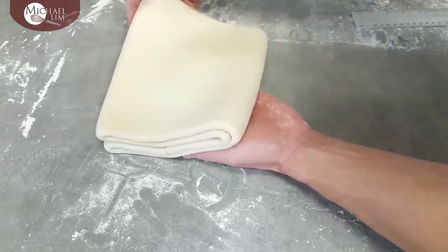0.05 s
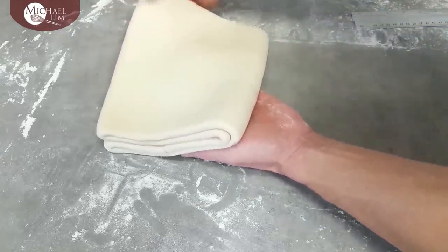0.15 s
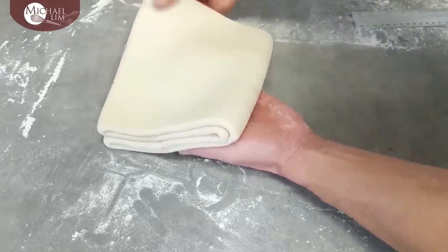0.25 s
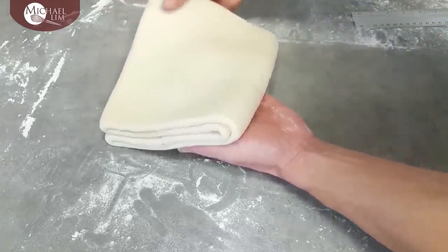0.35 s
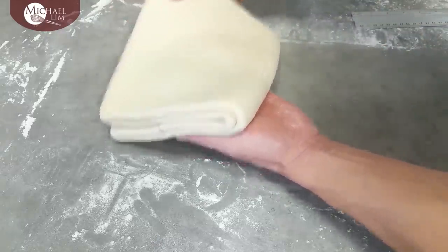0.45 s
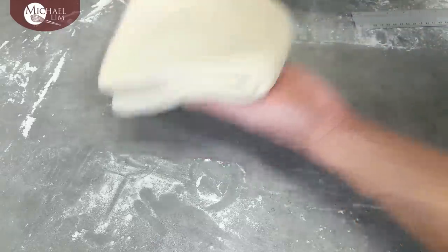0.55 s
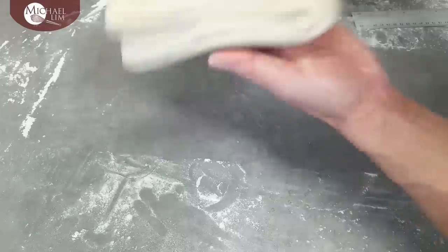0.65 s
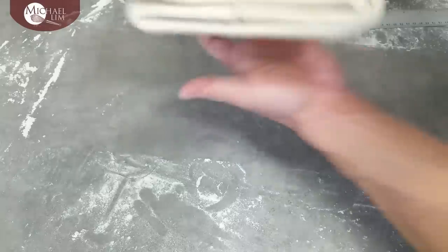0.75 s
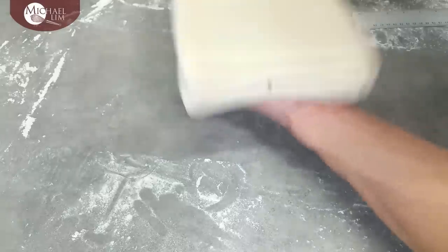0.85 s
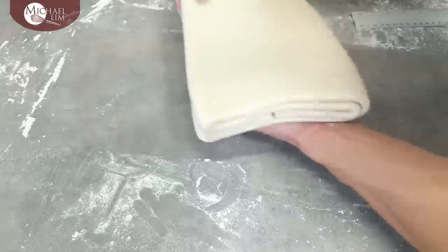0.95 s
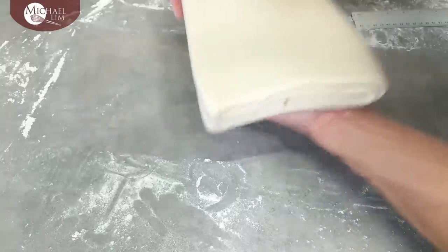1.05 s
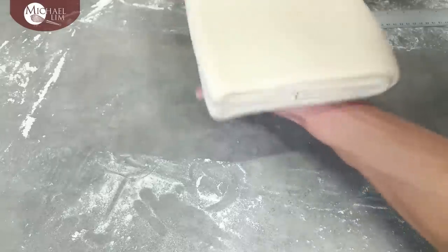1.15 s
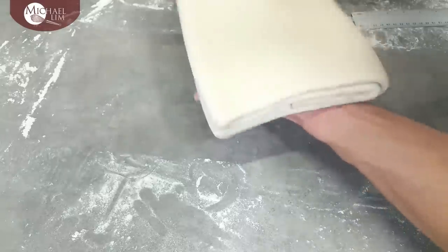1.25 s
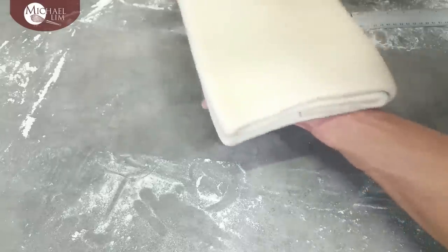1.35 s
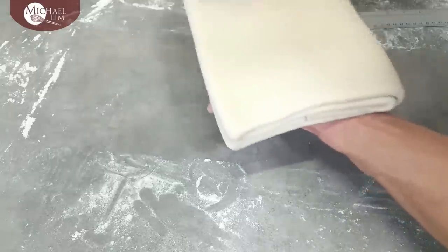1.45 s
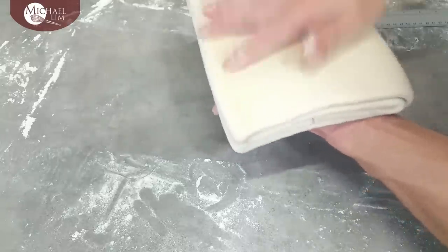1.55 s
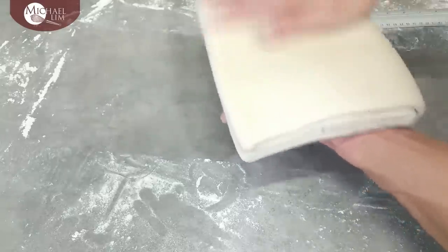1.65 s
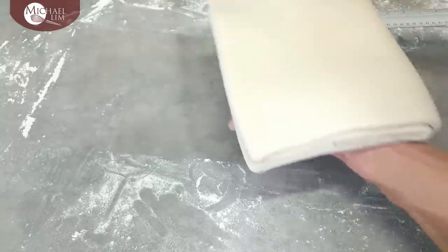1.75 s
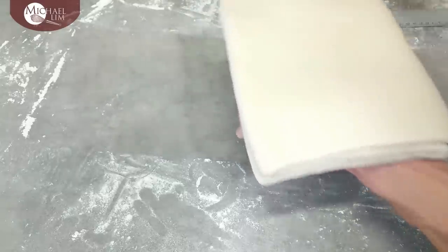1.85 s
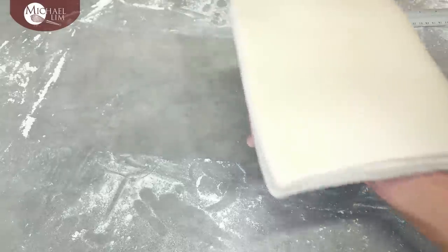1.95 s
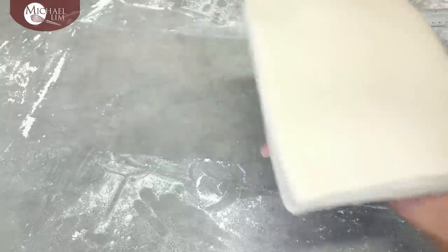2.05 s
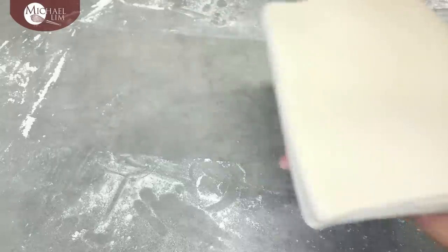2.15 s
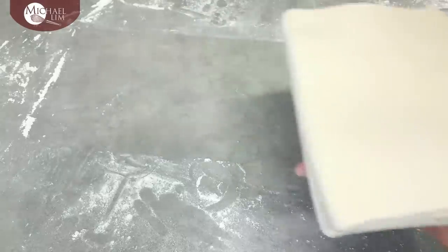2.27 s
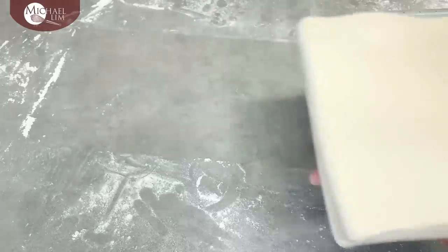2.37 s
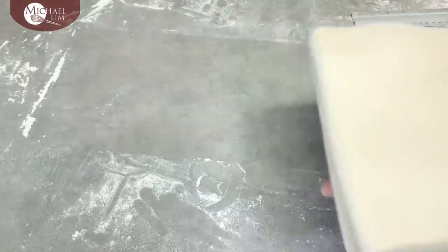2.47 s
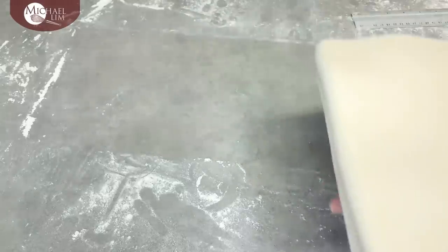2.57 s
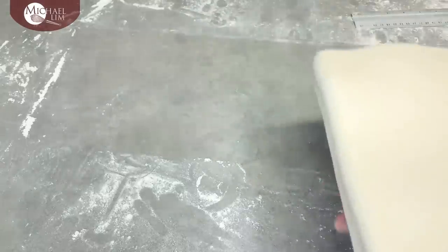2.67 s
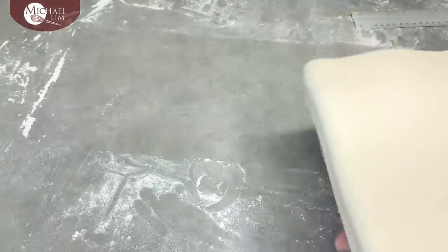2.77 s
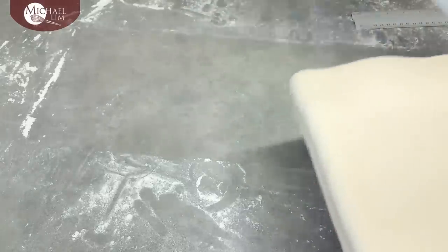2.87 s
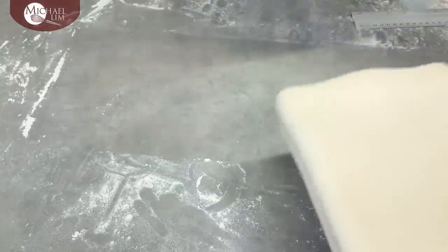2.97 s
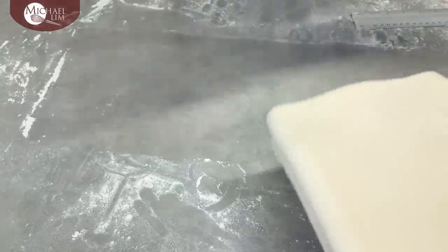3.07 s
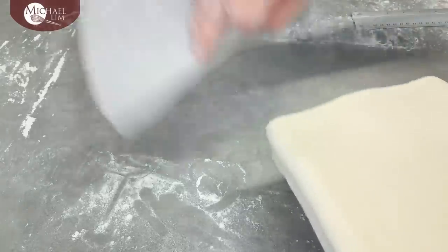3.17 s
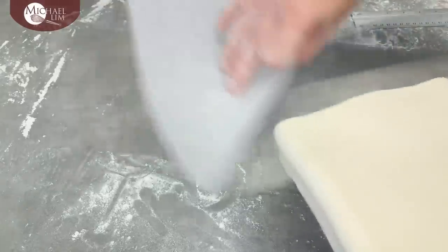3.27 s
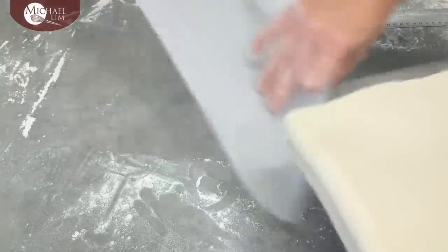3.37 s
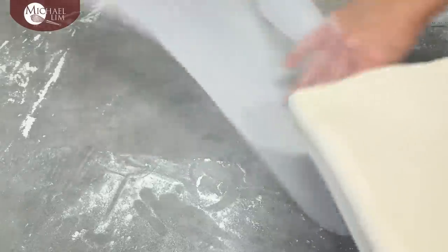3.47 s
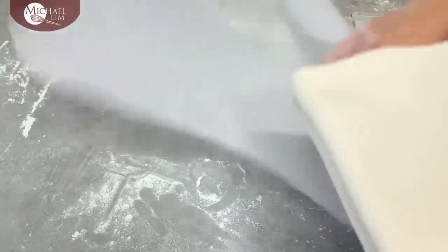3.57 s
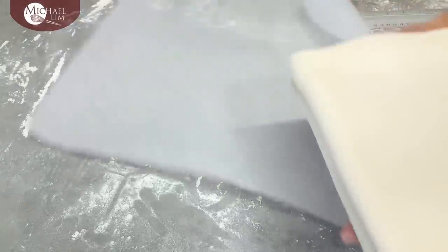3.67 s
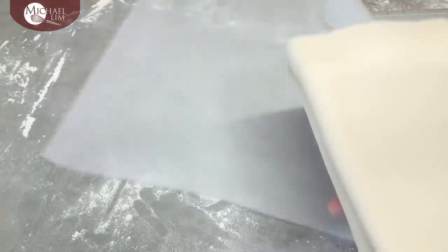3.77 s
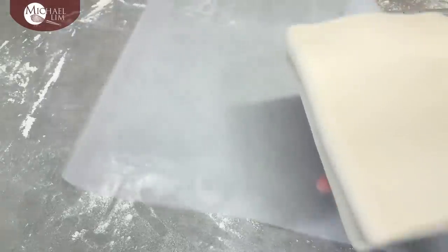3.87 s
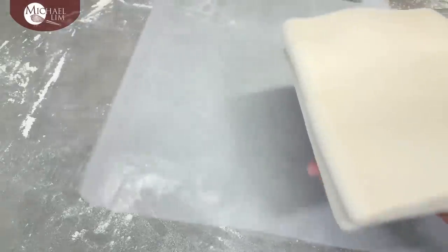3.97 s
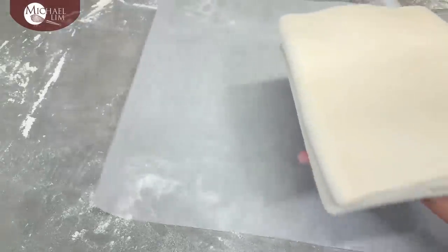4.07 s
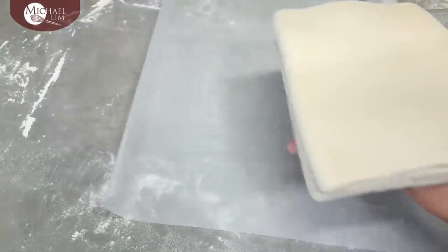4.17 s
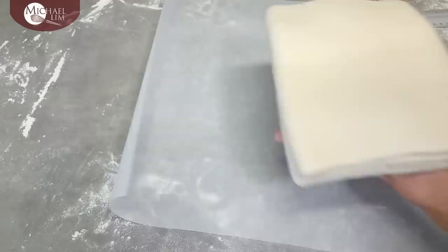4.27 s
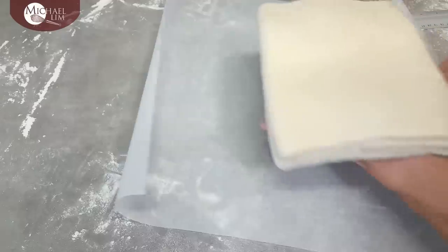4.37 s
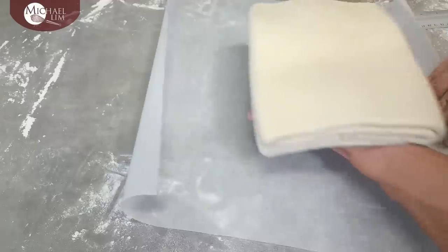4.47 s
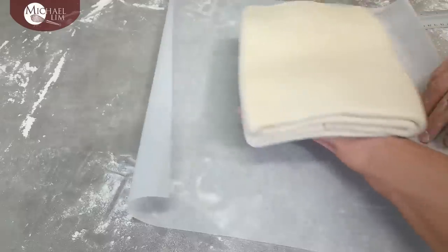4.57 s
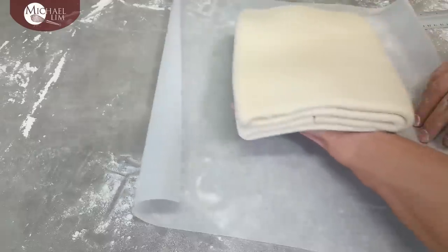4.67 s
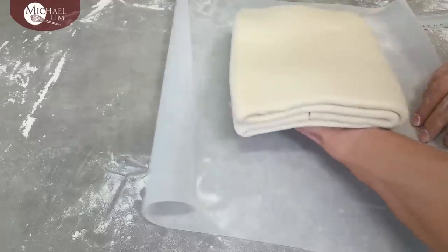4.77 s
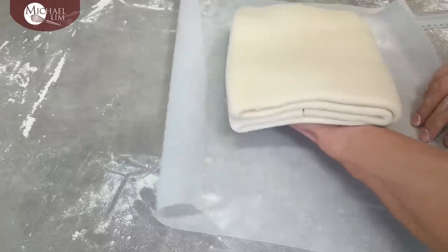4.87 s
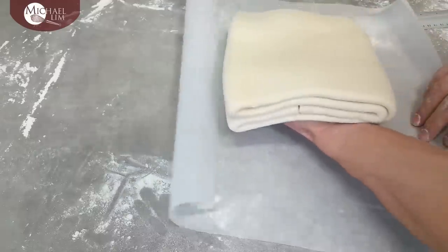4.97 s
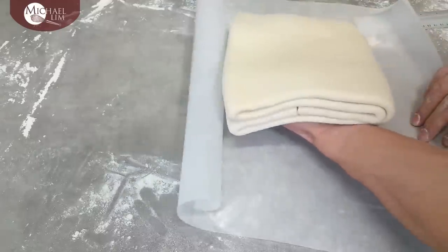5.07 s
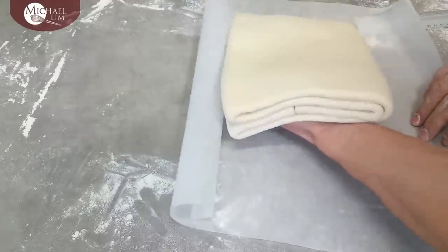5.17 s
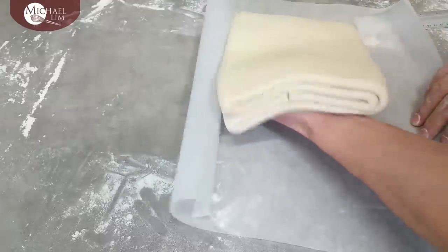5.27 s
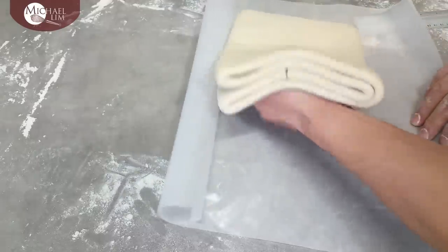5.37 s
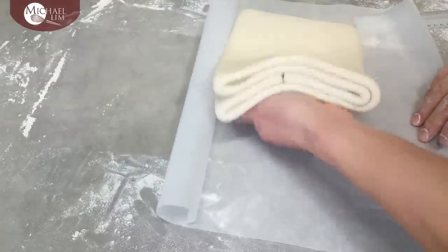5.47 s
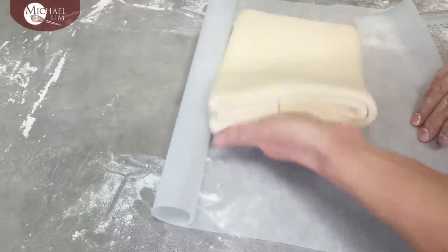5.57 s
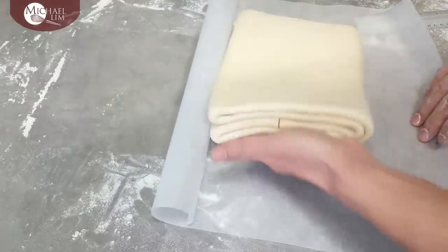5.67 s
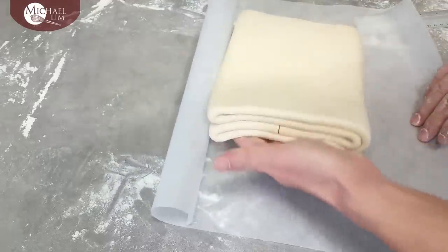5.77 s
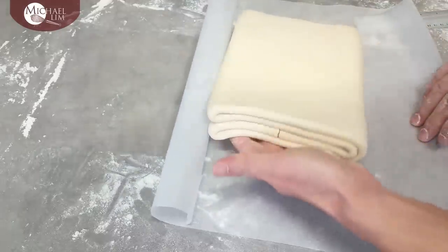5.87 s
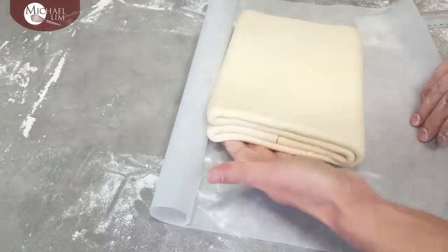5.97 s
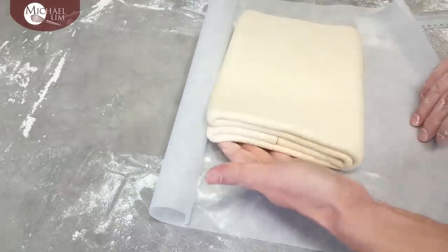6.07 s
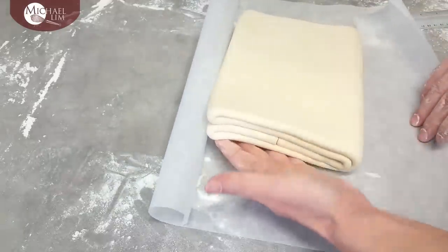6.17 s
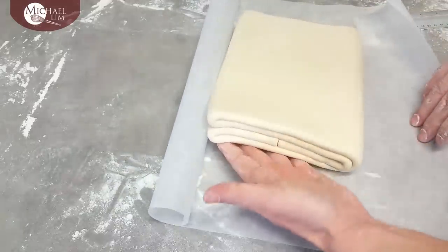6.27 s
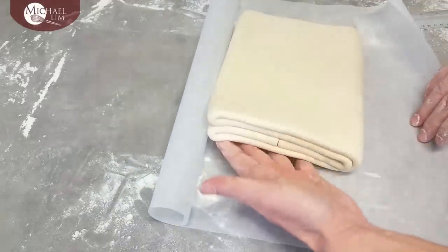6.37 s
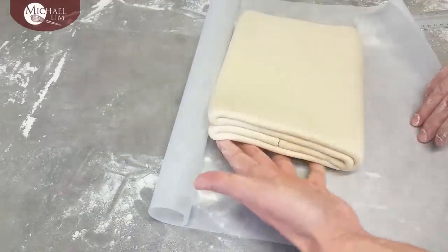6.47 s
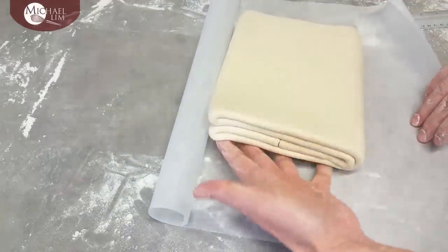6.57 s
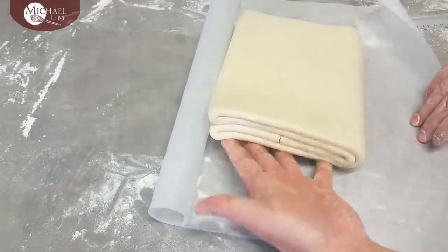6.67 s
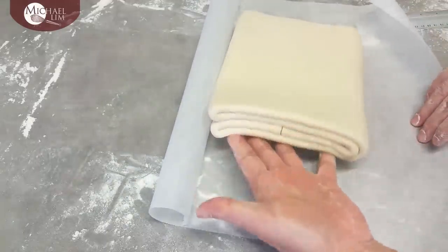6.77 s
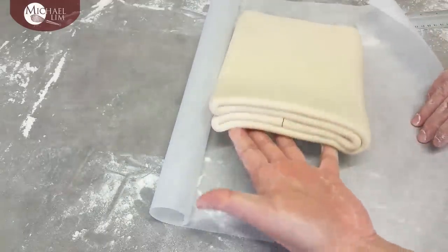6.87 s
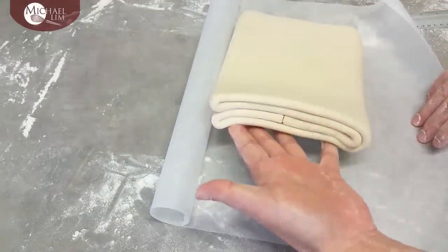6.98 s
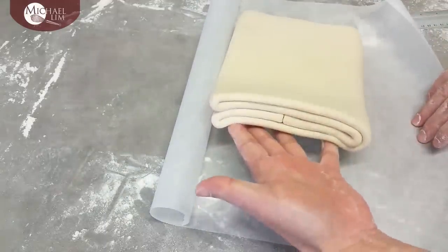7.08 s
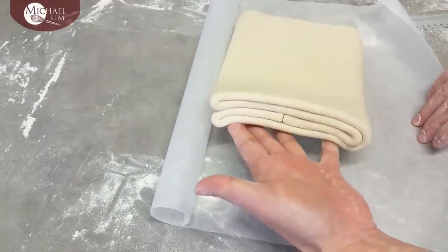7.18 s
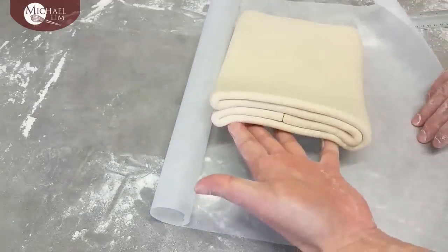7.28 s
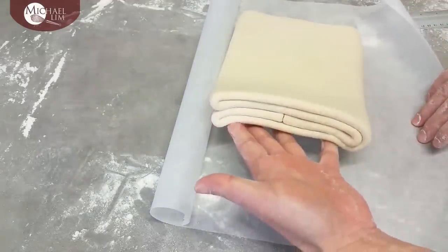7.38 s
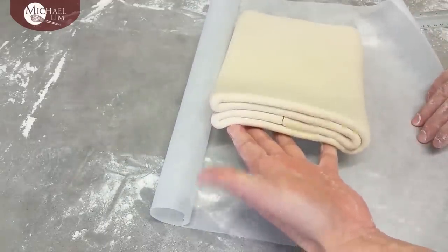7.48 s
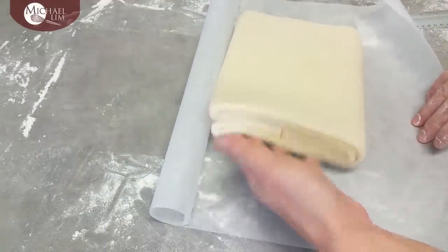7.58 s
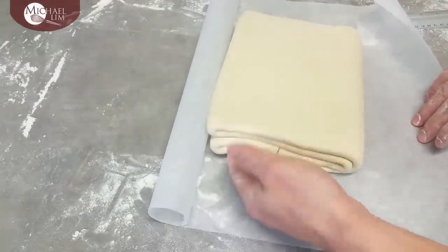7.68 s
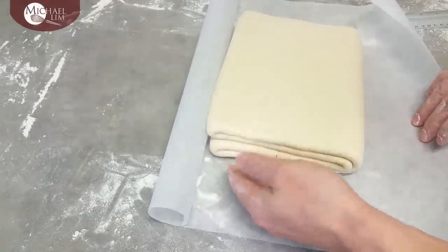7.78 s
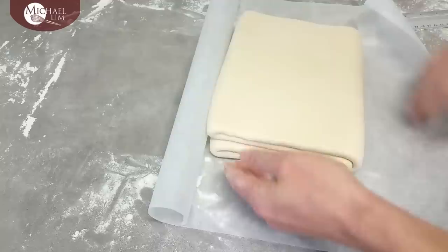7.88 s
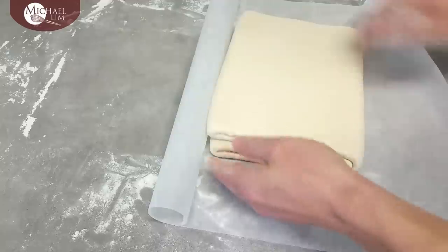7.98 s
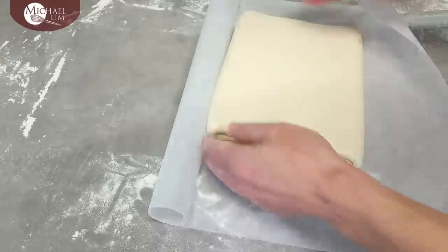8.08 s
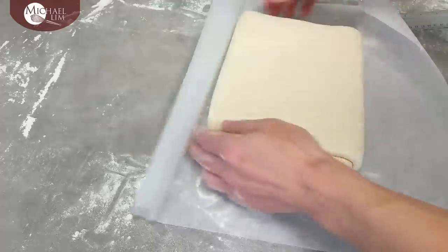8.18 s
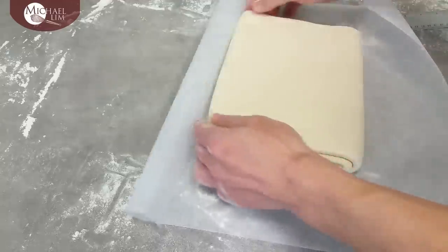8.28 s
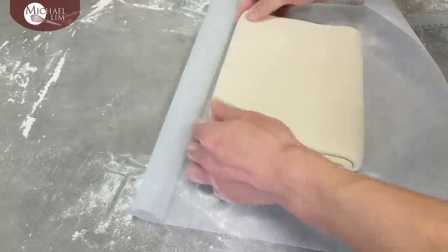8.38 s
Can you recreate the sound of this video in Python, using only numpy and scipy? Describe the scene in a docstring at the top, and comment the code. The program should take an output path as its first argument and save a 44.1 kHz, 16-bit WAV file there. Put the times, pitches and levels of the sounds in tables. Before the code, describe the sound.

A palm pats dough before crisp baking paper is pulled out with crinkles and snaps, and the dough slides softly onto it.

```python
"""Soft pats of a palm on a folded block of dough, close to a stereo pair of microphones in a kitchen.
Then, louder, a sheet of baking parchment is pulled out and laid on a steel bench, and the dough is slid
onto it. The sheet rustles with countless tiny buckles and snaps where a crease flips.
Hard walls ring behind it, over a low ventilation noise."""
import sys
import numpy as np
from scipy import signal
from scipy.fft import rfft, irfft, next_fast_len
from scipy.io import wavfile

SR = 44100
rng = np.random.default_rng(int(sys.argv[2]) if len(sys.argv) > 2 else 0)


def digitize_waveform(pressure):
    """Quantize a signal to 16-bit integers and store it at the path in sys.argv[1].

    Rows of a 2-D input are taken as channels; values are limited to [-1, 1].
    """
    field = np.atleast_2d(pressure).T
    bounded = np.clip(field, -1, 1)
    quanta = np.round(bounded * 32767).astype(np.int16)
    wavfile.write(sys.argv[1], SR, quanta)


N = 371763
TIME = np.arange(N) / SR


# spectrum of the sheet in free air: f/Hz, level/dB
FREE_SHEET = [(59, -87), (100, -5), (210, -25), (356, -10.5), (405, -16.5), (522, -7.5), (886, -5),
              (1140, 0), (1640, 1.5), (1750, 0.5), (4160, -2.5), (6920, -11), (7690, -14.5), (11500, -12.5),
              (15800, -27)]
# pulls and shakes in front of the microphones: t/s, rise/s, hold/s, level/dB, relative crispness/dB
PULL_STROKES = [(2.268, 0.012, 0.043, -40.5, -6), (2.302, 0.01, 0.11, -33, -7),
                (2.44, 0.027, .07, -34.5, -8), (2.525, 0.081, .02, -26.5, -7),
                (2.64, 0.053, .06, -34.5, -5), (2.705, 0.029, 0.018, -27.5, -5.5),
                (2.76, 0.02, 0.21, -31, -8.5), (2.99, 0.043, 0.066, -38.5, -14),
                (3.065, 0.026, 0.031, -37.5, -7), (3.14, 0.018, 0.079, -44.5, -13),
                (3.294, 0.025, 0.021, -38.5, -6.5), (3.37, 0.064, 0.25, -46, -10.5),
                (3.591, 0.0045, 0.0051, -27.5, -8), (3.635, 0.032, 0.13, -40, -13),
                (3.78, 0.023, 0.063, -50.5, -10)]
def pulled_sheet():
    """The sheet buckles and billows as it is pulled out."""
    return rustle(PULL_STROKES, FREE_SHEET, hiss_db=-1.5, billow_db=-13.5, body_db=0.5, crisp_db=-1)


# spectrum of the curling sheet: f/Hz, level/dB
CURLING_SHEET = [(500, -25), (1000, -9), (1600, -6.5), (2300, -0.5), (3500, -3.5), (5000, -7), (7700, -16),
                 (11500, -12.5), (15800, -27)]
# its movements on the bench: t/s, rise/s, hold/s, level/dB, relative crispness/dB
CURL_STROKES = [(3.84, 0.065, 0.058, -45, -8.5), (3.957, .01, 0.09, -40, -9), (4.03, 0.03, 0.016, -37, -7),
                (4.199, 0.014, 0.0075, -35, -8), (4.235, 0.011, 0.017, -51, -17),
                (4.3, 0.058, 0.14, -51, -5.5), (4.43, 0.033, 0.014, -48, -12.5),
                (4.54, 0.049, 0.13, -62, -16)]
def curling_sheet():
    """The landed sheet settles and its edge curls up."""
    return rustle(CURL_STROKES, CURLING_SHEET, hiss_db=-1, billow_db=-20, body_db=-2.5, crisp_db=-2.5)


# spectrum of the sheet lying on steel: f/Hz, level/dB
LYING_SHEET = [(290, -25), (500, -18), (639, -10.5), (739, -5.5), (904, -3), (986, -4.5), (1540, -1.5),
               (2250, -6.5), (4120, -11.5), (6830, -22.5), (7670, -24.5), (12200, -22), (15800, -36)]
# slides at the bench: t/s, rise/s, hold/s, level/dB, relative crispness/dB
SLIDE_STROKES = [(4.86, 0.022, .1, -61, -14.5), (4.999, 0.0069, 0.0069, -45, -21),
                 (5.03, 0.11, .16, -47, -11.5), (5.282, 0.0026, 0.0053, -41, -23),
                 (5.33, 0.067, 0.21, -46.5, -9), (5.547, 0.0047, 0.18, -46, -8.5),
                 (5.75, 0.025, 0.13, -56.5, -9), (5.95, 0.04, 0.17, -54, -10), (6.2, 0.019, 0.01, -54, -18),
                 (6.31, 0.022, 0.36, -61, -7.5), (6.47, 0.083, 0.033, -54.5, -5.5),
                 (6.66, 0.008, .025, -60.5, -26), (6.72, 0.038, 0.2, -75, -12),
                 (7.67, 0.084, 0.034, -53.5, -14), (7.756, 0.0084, 0.0067, -47.5, -16),
                 (7.78, 0.026, 0.093, -52, -9), (7.94, 0.065, 0.25, -52, -6),
                 (8.19, 0.086, 0.094, -43.5, -9.5), (8.386, 0.019, .04, -38.5, -8.5)]
def sliding_on_sheet():
    """Hand and dough rub over the lying sheet with a duller rustle."""
    return rustle(SLIDE_STROKES, LYING_SHEET, hiss_db=-4.5, billow_db=-18, body_db=-0.5, crisp_db=-1)


def rustle(strokes, spectrum, hiss_db, billow_db, body_db, crisp_db):
    """Buckles and sliding friction under each stroke; the sheet billows low in step with it."""
    grain = coloured(buckles() + from_db(hiss_db) * long_noise(), spectrum)
    body = from_db(body_db) * rms_one(cut(grain, "band", [700, 5000], order=3))
    top = from_db(crisp_db) * rms_one(cut(grain, "band", [5000, 19000], order=3))
    billow = rms_one(cut(coloured(long_noise(), FREE_SHEET), "band", [150, 700], order=3))
    body_gain, top_gain = stroke_gains(strokes)
    return body_gain * (body + from_db(billow_db) * billow) + top_gain * top


def buckles(per_s=2200, spread_db=4, clump_db=4.5, flex_db=1):
    """Tiny buckles come in clumps; each briefly rings a facet, and facets change as the sheet flexes."""
    born = np.flatnonzero(rng.random(N) < per_s / SR * from_db(clump_db * drift(70)))
    size, sign, facet, place = rng.random((4, N))[:, born]
    size = from_db(spread_db * np.minimum(-np.log(1 - size), 4)) * np.sign(sign - .5)
    lag = ((2 * place - 1) * .0004 * SR).astype(int)   # path difference between the microphones
    pitches, out = np.geomspace(500, 14000, 12), 0
    for k, hz in enumerate(pitches):
        here = (facet * len(pitches)).astype(int) == k
        clicks = np.zeros((2, N))
        clicks[0, born[here]] = size[here]
        clicks[1, np.clip(born + lag, 0, N - 1)[here]] = size[here]
        ring = resonate(clicks + 1e-18, hz, hz * 0.5)
        out = out + 0.77 * clicks + from_db(flex_db * drift(9)) * ring
    return rms_one(out)


def stroke_gains(strokes, sag_db_per_s=9, release_db_per_s=212):
    """Each stroke rises, sags while held and dies away; gives gains for the body and the crisp top."""
    body, top = np.zeros((2, N))
    for start, rise, hold, db, crisp_db in strokes:
        first = int(start * SR)
        t = TIME[:min(N - first, SR)]
        sag_db = sag_db_per_s * np.maximum(t - rise, 0)
        release_db = release_db_per_s * np.maximum(t - rise - hold, 0)
        gain = np.minimum(t / rise, 1) * from_db(db - sag_db - release_db)
        body[first:first + len(t)] += gain ** 2
        top[first:first + len(t)] += (gain * from_db(crisp_db)) ** 2
    return np.sqrt(body), np.sqrt(top)


# creases giving way, close by: t/s, level/dB, facet f/Hz, relative treble/dB
CREASES = [(2.345, -16.5, 1600, -7), (2.396, -14.5, 1160, -15), (2.58, -12.5, 1020, -31),
           (2.61, -12, 2930, 9), (2.727, -11, 2300, 1), (2.817, -13, 1880, -8), (2.93, -10.5, 1910, -7),
           (3.331, -28, 1650, -27), (3.538, -22, 1440, -19), (3.597, -20, 1600, -31),
           (4.004, -32, 2620, -7), (4.066, -20, 2700, -5), (4.217, -21.5, 1600, -8),
           (4.473, -29.5, 2030, -15), (5.294, -23.5, 1190, -29), (5.555, -28, 1580, -31),
           (5.584, -35, 1060, -35), (5.647, -27, 2720, -6), (5.718, -33.5, 1130, -28),
           (6.118, -36.5, 1850, -22), (8.028, -37, 1600, -23), (8.229, -26, 1930, -12),
           (8.338, -30, 1650, -32), (8.394, -24.5, 1260, -21)]
def crumples():
    """Creases flip loudly as the sheet is handled."""
    return snaps(CREASES, decay_s=0.0043, gain_db=-0.5, facet_db=21, treble_db=28.5, ragged_db=5)


# single sharp ticks: t/s, level/dB, facet f/Hz, relative treble/dB
SHEET_TICKS = [(3.208, -27.5, 2210, -14), (3.383, -26, 4790, 16), (3.868, -30, 2220, -33),
               (3.961, -24.5, 2370, 0), (4.398, -38.5, 2060, -24.5), (4.807, -39.5, 3220, -20),
               (4.937, -43, 2600, 1), (6.669, -42, 2000, -32), (6.852, -52, 1100, -35),
               (8.278, -27.5, 1830, -25)]
# spells of settling on the bench: from t/s, to t/s
SETTLING_SPELLS = [(4.55, 5.0), (6.6, 7.0)]
def ticks():
    """The stiff sheet ticks sharply, and faintly at random moments as it settles under the dough."""
    faint = [(rng.uniform(start, end), -55, 2200 * 2 ** rng.uniform(-1, 1), -14)
             for start, end in SETTLING_SPELLS for _ in range(6)]
    return snaps(SHEET_TICKS + faint, decay_s=0.0014, gain_db=4, facet_db=12, treble_db=21, ragged_db=7.5)


def snaps(table, decay_s, gain_db, facet_db, treble_db, ragged_db):
    """A crease flips in a fast, ragged run of cracks that rings one facet of the sheet."""
    out, t = np.zeros((2, N)), TIME[:2 ** 12]
    for s, db, hz, own_treble_db in table:
        ragged = from_db(ragged_db * np.repeat(rng.standard_normal(len(t) // 32), 32))
        cracks = coloured(rng.standard_normal((2, len(t))) * ragged * np.exp(-t / decay_s), FREE_SHEET)
        ring = from_db(facet_db) * resonate(cracks, hz, hz * 0.31)
        treble = from_db(own_treble_db + treble_db) * cut(cracks, "high", 3300, order=1)
        snap = cut(cracks + ring + treble, "high", 480)
        add(out, s, from_db(db + gain_db) * snap / np.abs(snap).max())
    return out


# pats on the dough in the hand, close by: t/s, level/dB, low-pass f/Hz, contact decay/s
PALM_PATS = [(0.116, -40.5, 2200, 0.0008), (0.958, -31, 5000, 0.0035), (0.963, -22.5, 1030, 0.0037),
             (1.014, -38, 4500, 0.0017), (1.308, -42.5, 1400, 0.019), (1.331, -40.5, 796, 0.022),
             (1.678, -46.5, 3530, 0.0034)]
# resonances of palm against dough: f/Hz, width/Hz, level/dB
PALM_MODES = [(214, 186, -8.5), (300, 79, 4), (560, 134, 3), (727, 215, 2.5), (1045, 500, -0.5),
              (1600, 1340, -3.5)]
def pats(gain_db, smack_db):
    """Soft contacts: a short push into the damped dough, with a smack of skin on top."""
    out, t = np.zeros((2, N)), TIME[:2 ** 12]
    for s, db, dull_hz, decay_s in PALM_PATS:
        push = diffuse(len(t)) * np.exp(-t / decay_s)
        thud = sum((-1) ** k * from_db(mode_db) * resonate(push, hz, width)
                   for k, (hz, width, mode_db) in enumerate(PALM_MODES))
        smack = from_db(smack_db) * cut(push, "high", 1100, order=1)
        pat = cut(thud + smack, "low", dull_hz, order=1)
        add(out, s, from_db(db + gain_db) * pat / np.abs(pat).max())
    return out


# hand, dough and sheet meeting each other or the bench: t/s, level/dB, f/Hz, decay/s
LOW_BUMPS = [(0.172, -43.5, 230, 0.028), (0.964, -17, 235, 0.0074), (0.968, -25, 545, 0.0087),
             (1.336, -37, 237, 0.011), (2.222, -41.5, 560, 0.014), (2.274, -19, 614, 0.0065),
             (2.612, -22.5, 463, 0.007), (2.736, -30, 208, 0.02), (3.598, -29, 250, 0.012),
             (8.328, -31.5, 156, 0.0092), (8.33, -27, 366, 0.0039)]
def bumps(gain_db, attack_s=0.00086):
    """A dull blow rings briefly in one broad low resonance."""
    out, t = np.zeros((2, N)), TIME[:2 ** 13]
    for s, db, hz, decay_s in LOW_BUMPS:
        envelope = (1 - np.exp(-t / attack_s)) * np.exp(-t / decay_s)
        add(out, s, from_db(db + gain_db) * envelope * np.sin(2 * np.pi * hz * t))
    return out


# the palm brushing the floured dough: t/s, level/dB, half length/s, low-pass f/Hz
PALM_BRUSHES = [(0.12, -61, 0.32, 1940), (0.844, -66, 0.14, 3500), (1.32, -67, 0.096, 12000),
                (1.44, -67, 0.062, 12000), (1.727, -55, 0.036, 15000)]
# spectrum of rubbing skin: f/Hz, level/dB
SKIN_HISS = [(290, -19), (500, -3.5), (1060, -11.5), (1170, -3), (1860, -9.5), (2450, -6), (3040, -7),
             (7780, -18), (10900, -9.5), (15800, -20)]
def brushes():
    """Dry skin slides over flour with a swelling hiss, duller when it moves slowly."""
    hiss = rms_one(coloured(long_noise(), SKIN_HISS))
    return sum(swells([(s, db, half_s)]) * cut(hiss, "low", dull_hz, order=1)
               for s, db, half_s, dull_hz in PALM_BRUSHES)


# a fingertip on the dough: t/s, f/Hz, level/dB
FINGER_SQUEAK = [(1.67, 1866, -85), (1.682, 1910, -54), (1.70, 1710, -70), (1.73, 1740, -57),
                 (1.747, 1970, -62.5), (1.76, 1940, -87)]
def squeak(waver):
    """Skin sticks and slips at an unsteady rate."""
    s, hz, db = np.transpose(FINGER_SQUEAK)
    slip_hz = np.interp(TIME, s, hz) * (1 + waver * drift(540))
    gain = from_db(np.interp(TIME, s, db)) * (TIME > s[0]) * (TIME < s[-1])
    return gain * np.sin(2 * np.pi * np.cumsum(slip_hz) / SR)


def kitchen(x, spots):
    """The sound wanders among several spots on the bench, each with reflections of its own."""
    shares = np.array([drift(9) for _ in range(spots)])
    shares = shares / np.sqrt(np.sum(shares ** 2, axis=0))
    return x + sum(signal.fftconvolve(x * share, room_response(), axes=1)[:, :N] for share in shares)


# ring of the hard walls, farther off: f/Hz, time to fall 60 dB/s
WALL_DECAY = [(150, 0.28), (500, 0.44), (1500, 0.42), (4000, 0.46), (12000, 0.26)]
def room_response(early_db=-5, early_s=0.0059, tail_db=-6.5):
    """Quick scatter from the bench and nearby things, then a tail that dies band by band."""
    t, edges = TIME[:2 ** 15], 80 * 2 ** np.arange(9)
    noise, tail = diffuse(len(t)), 0
    for low, high in zip(edges, edges[1:]):
        t60 = at_hz(WALL_DECAY, np.sqrt(low * high))
        tail = tail + cut(noise, "band", [low, high]) * from_db(-60 * t / t60)
    tail = tail * np.clip(t / 0.013, 0, 1)
    early = diffuse(len(t)) * np.exp(-t / early_s) * (t > .001)
    return (from_db(early_db) * rms_one(early) + from_db(tail_db) * rms_one(tail)) / np.sqrt(len(t))


# room tone, spectra of the rumble and of the air noise: f/Hz, level/dB
VENT_RUMBLE = [(15, -40), (25, -1.5), (107, -3), (129, -3.5), (155, -4.5), (316, -2), (541, -16.5),
               (573, -31), (634, -13), (800, -32), (1040, -66), (1760, -120)]
VENT_AIR = [(240, -31.5), (400, -7.5), (579, -9), (635, -11), (799, -10.5), (932, -7), (1070, -12),
            (1230, -14), (1750, -19.5), (2690, -17.5), (4080, -22), (4410, -27.5), (8030, -36),
            (11300, -24), (15800, -35)]
# motor tones in the background: f/Hz, level/dB
MOTOR_HUM = [(102.3, -75.5), (166.9, -78), (274.5, -77.5)]
# air stirred by arms and sheet: t/s, level/dB, half length/s
AIR_WAFTS = [(0, -58.5, 0.22), (1.3, -60, 1.0), (2.92, -53, 0.23), (3.95, -59.5, 0.47), (5.5, -60.5, 0.31),
             (8.43, -61, 0.28)]
def ventilation(rumble_db, waft_gain_db, air_db, hum_gain_db):
    """A steady rumble that swells when air is stirred, air noise and a faint motor hum."""
    level = np.hypot(from_db(rumble_db), from_db(waft_gain_db) * swells(AIR_WAFTS))
    rumble = level * rms_one(cut(coloured(long_noise(), VENT_RUMBLE), "low", 670, order=4))
    air = from_db(air_db) * rms_one(cut(coloured(long_noise(), VENT_AIR), "high", 424, order=4))
    hum = sum(from_db(db + hum_gain_db) * np.sqrt(2) * np.sin(2 * np.pi * hz * TIME + .5 * drift(5.1))
              for hz, db in MOTOR_HUM)
    return rumble + air + hum


# a drone far in the background: t/s, level/dB, half length/s
DRONE_SWELLS = [(.41, -68, .07), (.95, -64, 0.21), (1.34, -62, 0.11)]
def drone(hz):
    """A faint, wavering low tone comes and goes."""
    return swells(DRONE_SWELLS) * np.sqrt(2) * np.sin(2 * np.pi * hz * TIME + 0.3 * drift(7.7))


# balance of the stereo pair: f/Hz, left minus right level/dB
PAIR_BALANCE = [(60, 1.5), (130, 3), (300, -0.5), (550, -0.5), (900, 1.5), (1800, 2), (3300, 3), (4500, 2),
                (6200, -11), (8500, -4.5), (12000, 8), (15000, -0.5)]
def microphones(x):
    """Each microphone has its own colour: what one lifts, the other lowers."""
    return np.vstack([coloured(channel[None], [(hz, share * db) for hz, db in PAIR_BALANCE])
                      for channel, share in zip(x, (.5, -.5))])


# diffuse sound across the pair: f/Hz, coherence
PAIR_COHERENCE = [(60, 0.84), (250, 0.89), (500, 0.72), (1000, 0.3), (2000, 0.16), (12000, -0.19)]
def diffuse(size):
    """White noise from all around: alike at both microphones in the bass only."""
    mid, side = rfft(rng.standard_normal((2, size)))
    alike = at_hz(PAIR_COHERENCE, np.arange(len(mid)) * SR / size)
    return irfft(np.sqrt(1 + alike) * mid + np.sqrt(1 - alike) * side * [[1], [-1]], size)


def long_noise():
    """Diffuse noise for the whole scene."""
    return diffuse(next_fast_len(N, True))[:, :N]


def drift(per_s):
    """A random wander of unit rms."""
    knots = rng.standard_normal(2 ** 13)
    return rms_one(np.interp(TIME * per_s, np.arange(len(knots)), knots))


def swells(table):
    """Smooth rises and falls of level, as a gain."""
    return sum(from_db(db) * np.exp(-.5 * ((TIME - s) / half_s) ** 2) for s, db, half_s in table)


def from_db(db):
    """Decibels to gain."""
    return 10 ** (np.asarray(db) / 20)


def rms_one(x):
    """Scale to unit rms."""
    return x / np.sqrt(np.mean(x ** 2) + 1e-20)


def at_hz(points, hz):
    """Read a table on a log-frequency axis."""
    f, value = np.transpose(points)
    return np.interp(np.log(np.maximum(hz, 1)), np.log(f), value)


def cut(x, kind, hz, order=2):
    """Butterworth filter."""
    return signal.sosfilt(signal.butter(order, hz, kind, fs=SR, output="sos"), x + 1e-18)


def resonate(x, hz, width_hz):
    """A resonance with gain 1 at its peak."""
    r = np.exp(-np.pi * width_hz / SR)
    feedback = [1, -2 * r * np.cos(2 * np.pi * hz / SR), r * r]
    return signal.lfilter(np.array([1, 0, -1]) * (1 - r * r) / 2, feedback, x)


def coloured(x, spectrum, size=2 ** 12):
    """Causal (minimum-phase) filter with the given spectrum."""
    gain = from_db(at_hz(spectrum, np.arange(size // 2 + 1) * SR / size))
    cepstrum = irfft(np.log(gain))
    cepstrum[1:size // 2] *= 2
    cepstrum[size // 2 + 1:] = 0
    impulse = irfft(np.exp(rfft(cepstrum)))
    return signal.oaconvolve(x, impulse[None], axes=1)[:, :x.shape[1]]


def add(out, s, sound):
    """Mix a short sound in at time s."""
    start = round(s * SR)
    out[:, start:start + sound.shape[-1]] += sound[..., :N - start]


def scene():
    """Paper and dough close to the pair, with the kitchen and its room tone behind."""
    paper = pulled_sheet() + curling_sheet() + sliding_on_sheet() + crumples() + ticks()
    dough = pats(gain_db=3.5, smack_db=-21) + bumps(gain_db=-8) + brushes() + squeak(waver=0.016)
    bench = kitchen(paper + dough, spots=5)
    room_tone = ventilation(rumble_db=-65.5, waft_gain_db=-.5, air_db=-64.5, hum_gain_db=2.5)
    return microphones(bench + room_tone + drone(hz=62))


def record(dry):
    """The top is cut steeply above 15.9 kHz."""
    return signal.sosfilt(signal.ellip(10, .1, 80, 15900, fs=SR, output="sos"), dry)


dry = scene()
out = record(dry)
digitize_waveform(out)
```